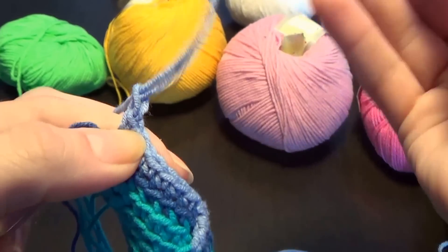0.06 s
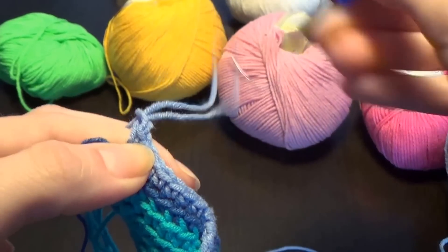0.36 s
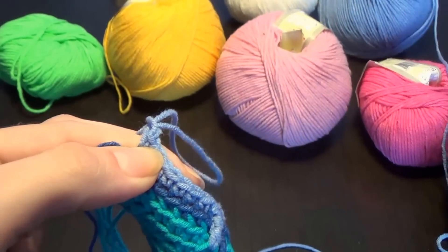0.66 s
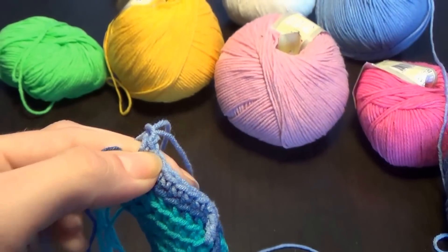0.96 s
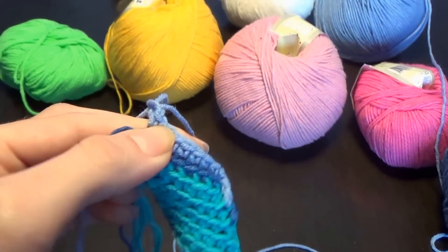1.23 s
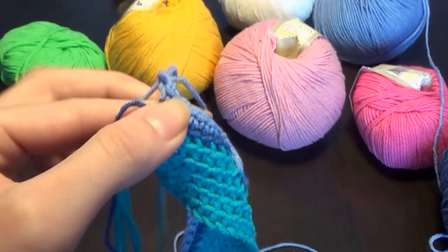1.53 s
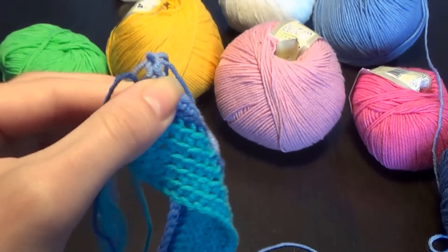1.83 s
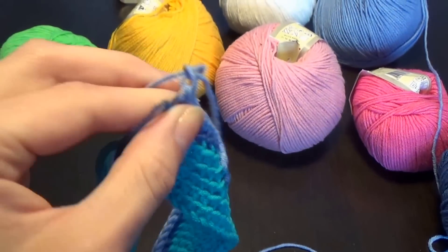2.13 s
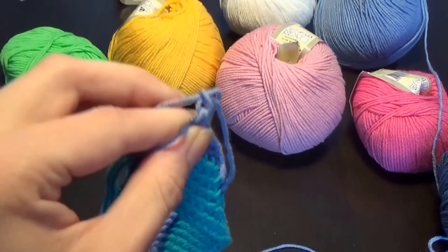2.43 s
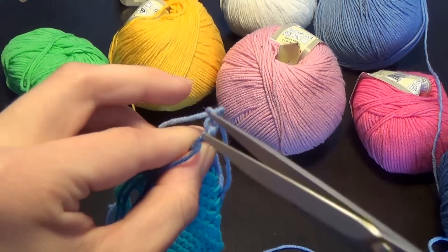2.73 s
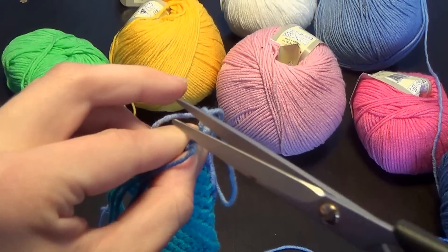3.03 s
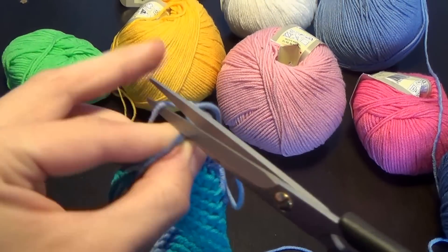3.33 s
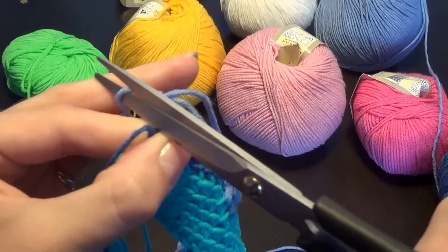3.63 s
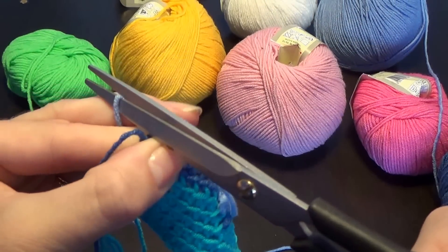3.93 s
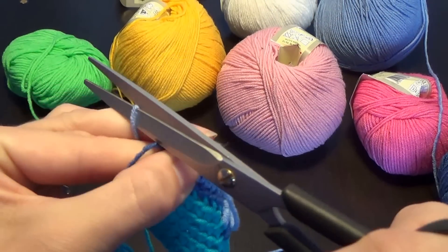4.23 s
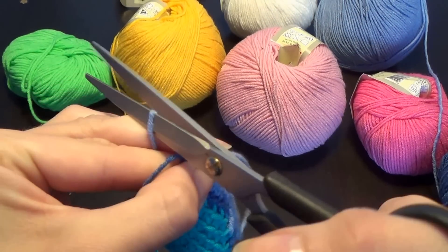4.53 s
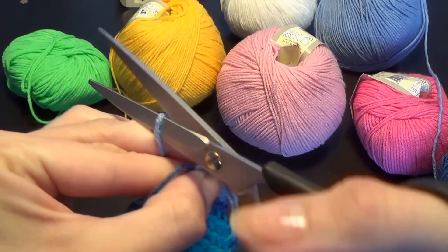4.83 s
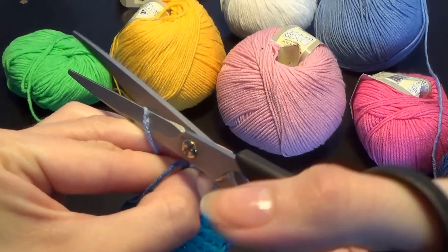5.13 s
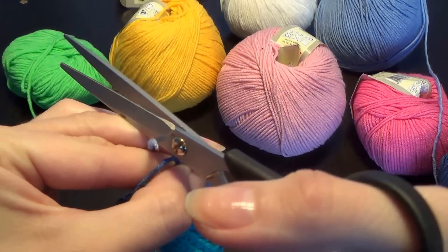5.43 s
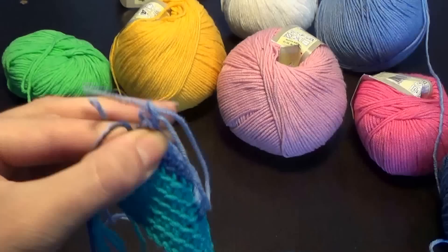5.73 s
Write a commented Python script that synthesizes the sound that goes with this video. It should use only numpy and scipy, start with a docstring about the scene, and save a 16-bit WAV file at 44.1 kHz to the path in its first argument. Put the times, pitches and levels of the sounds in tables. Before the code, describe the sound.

Small, close handling sounds are spaced out over soft indoor hum. First a hook taps and rings briefly on a tabletop, followed by a muffled low thump from a hand. Steel scissors give a short, sharp rattle when lifted. Yarn hisses very faintly over fingers and blades, until a single dry snip cuts it and the scissors touch the table.

```python
"""Cutting yarn at a table

In a quiet room, a crochet hook is laid on a table and rings, and a hand bumps the table softly.
Scissors clack as they are picked up, rub along the yarn, bite into it, snip shut
and are laid down again. Knocks are fading tones plus a crack of noise; rubbing is grainy noise.
A fan and mains hum murmur behind; the right microphone takes in more bass than the left."""
import sys
import numpy as np
from scipy import signal
from scipy.fft import rfft, irfft, next_fast_len
from scipy.io import wavfile
from scipy.ndimage import map_coordinates

SR = 44100
rng = np.random.default_rng(int(sys.argv[2]) if len(sys.argv) > 2 else 0)


def inscribe(sig):
    """Save sig as 16-bit PCM at rate SR to the path in sys.argv[1].

    A 1-D sig is mono; a 2-D sig holds one channel per row.
    Samples are clipped to [-1, 1] before scaling.
    """
    pcm = np.round(np.clip(np.atleast_2d(sig).T, -1, 1) * 32767)
    wavfile.write(sys.argv[1], SR, pcm.astype(np.int16))


N = 264099
RING_T = np.arange(SR // 3) / SR  # seconds since a blow


def amp(db):
    """Turn decibels into a gain."""
    return 10 ** (np.asarray(db) / 20)

def unit(x):
    """Scale a sound to an average (rms) size of 1."""
    return x / np.sqrt(np.mean(x ** 2) + 1e-20)

def along(points, hz):
    """Read a curve of (frequency, value) points on a log frequency axis."""
    f, v = np.transpose(points)
    return np.interp(np.log(hz + 1), np.log(f + 1), v)

def filtered(x, response):
    """Turn each frequency up or down by the gain response(hz)."""
    size = x.shape[-1]
    padded = next_fast_len(size + 8192)
    return irfft(rfft(x, padded) * response(np.fft.rfftfreq(padded, 1 / SR)), padded)[..., :size]

def noise(spectrum, size):
    """Noise with the given tone colour, at rms 1."""
    return unit(filtered(rng.standard_normal(size), lambda hz: amp(along(spectrum, hz))))

def wobble(rate):
    """A smooth curve through `rate` random values a second."""
    return map_coordinates(rng.standard_normal(N // 8), [np.arange(N) * rate / SR], mode="wrap")

def add(track, s, sound):
    """Mix a sound into a track at second s."""
    part = track[round(s * SR):][:len(sound)]
    part += sound[:len(part)]

def stroke(s, length):
    """A swell that starts at s and is over after `length` seconds."""
    progress = np.clip((np.arange(N) / SR - s) / length, 0, 1)
    return np.sqrt(np.abs(np.sin(np.pi * progress)))

def ring(tones):
    """A struck thing's tones, a bit different each blow; each fades 60 dB in its fade time, t60."""
    hz, db, t60 = np.transpose(tones)[:, :, None]
    strength = db + rng.standard_normal(hz.shape)
    waves = np.sin(2 * np.pi * (hz * RING_T + rng.random(hz.shape)))
    return np.sum(amp(strength - 60 * RING_T / t60) * waves, 0)

def crack(spectrum, t60):
    """The brief noise of two things touching."""
    return noise(spectrum, len(RING_T)) * amp(-60 * RING_T / t60)

def blows(rows, body, attack_s):
    """Play body() once a row, with that row's brightness and its level over the first 5 ms."""
    track = np.zeros(N)
    for s, db, bright in rows:
        hit = body() * (1 - np.exp(-(RING_T / attack_s) ** 2))
        hit = filtered(hit, lambda hz: amp(bright * np.log2(np.clip(hz, 700, 9000) / 700)))
        add(track, s, amp(db) * hit / hit[RING_T < .005].std())
    return track

def friction(rows, spectrum):
    """Strokes of rubbing; tiny slips make the noise grainy."""
    pressure = sum(amp(db) * stroke(s, length) for s, length, db in rows)
    slips = amp(2 * wobble(300))
    return pressure * unit(noise(spectrum, N) * slips)


# tone colour of the air: f/Hz, level/dB
AIR_COLOUR = [(15, -46), (25, -23), (59, -11.5), (91, -14), (108, -7), (208, -5), (242, -4.5), (268, -8.5),
              (363, -8), (571, -12), (699, -8.5), (1220, -14.5), (1610, -17), (2070, -20.5), (10400, -28.5),
              (13500, -100), (22000, -120)]
# how alike the air sounds left and right: f/Hz, likeness (0-1)
AIR_LIKENESS = [(30, 0.36), (80, 0.82), (300, 0.91), (1500, 0.94), (4000, 0.89), (10000, 0.73)]
# tones of the fan and mains: f/Hz, level/dB, unsteadiness (0-1)
HUM_TONES = [(121.7, -63.5, 0.13), (146.7, -67, 0.23), (240.1, -62.5, 0.52), (374.6, -72.5, 1),
             (483.5, -70.5, 0.7), (1558, -78.5, .3), (5670, -91, 0.4)]

def room_tone():
    """Steady air noise with the wavering hum of a fan and the mains."""
    def shares(hz):
        angle = np.arccos(np.clip(along(AIR_LIKENESS, hz), -1, 1)) / 2
        return np.array([np.cos(angle), np.sin(angle)])
    air = np.array([noise(AIR_COLOUR, N), noise(AIR_COLOUR, N)])
    middle, side = amp(-53.8) * filtered(air, shares)
    for hz, db, unsteady in HUM_TONES:
        phase = 2 * np.pi * hz * np.arange(N) / SR
        tone = (1 + unsteady * wobble(7)) * np.sin(phase)
        drift = unsteady * wobble(7) * np.cos(phase)
        middle = middle + amp(db) * unit(tone + drift)
    return np.array([middle + side, middle - side])


# how long the room echoes: f/Hz, fade time/s
ECHO_FADE = [(200, 0.35), (2000, 0.25), (10000, 0.18)]

def wall_echo(x):
    """The walls answer with a short tail, different at each microphone."""
    hz, t, spectra = signal.stft(rng.standard_normal((2, SR // 2)), SR, nperseg=256)
    fade = amp(-60 * t / along(ECHO_FADE, hz)[:, None])
    tail = signal.istft(spectra * fade, SR, nperseg=256)[1]
    tail = tail + .5 * tail[::-1]  # the microphones sit close together
    return signal.fftconvolve(x[None], tail / np.linalg.norm(tail[0]), axes=1)[:, :N]

def scattered(x):
    """Hands and camera scatter short waves, so the treble differs between the microphones."""
    paths = crack([(500, -1), (2500, -12), (5000, -3), (10000, -9.5)], t60=0.028)
    side = amp(-14) * signal.fftconvolve(x, paths / np.linalg.norm(paths))[:N]
    return np.array([side, -side])

def placed(x, left_db):
    """A near source, louder on the left by left_db (on the right if negative)."""
    return x * amp([[left_db / 2], [-left_db / 2]])


# strokes along the yarn: t/s, length/s, level/dB
YARN_STROKES = [(1.86, 0.12, -60), (4.08, 0.26, -57), (4.39, 0.28, -59), (4.87, 0.2, -57)]
# tone colour of sliding yarn: f/Hz, level/dB
YARN_COLOUR = [(1200, -28), (3000, 2), (4500, 7.5), (6500, -10), (8500, 6.5), (10300, 7.5)]

def yarn_rubs():
    """Yarn hisses as it slides over fingers and steel."""
    return friction(YARN_STROKES, YARN_COLOUR)


# strokes over the table: t/s, length/s, level/dB
DRAG_STROKES = [(0.818, 0.025, -45.5), (5.865, 0.062, -53), (5.915, 0.065, -50)]
# tone colour of the scraped table top: f/Hz, level/dB
SCRAPE_COLOUR = [(400, -32), (900, 9), (1400, -1), (2600, 4.5), (3600, -14), (5200, -10), (7000, -15),
                 (10000, -16.5)]

def tool_drags():
    """A tool scrapes briefly over the table."""
    return friction(DRAG_STROKES, SCRAPE_COLOUR)


# the hand lands: t/s, level/dB
HAND_BUMPS = [(1.2237, -31), (1.274, -38.5), (1.361, -40), (1.451, -40)]
# low tones of the table: f/Hz, level/dB, fade time/s
TABLE_TONES = [(77.4, -12, 0.048), (118, 5.5, 0.027), (169, 3, 0.027), (256, -6, 0.034), (496, -6.5, 0.021)]
# a fingernail touches too: t/s, level/dB, brightness/(dB per octave)
NAIL_TAP = [(1.2395, -48, 1)]

def hand_bumps():
    """A soft hand pushes all the table's low tones the same way, as it lands and as it settles."""
    thud = sum(amp(db - 60 * RING_T / t60) * np.sin(2 * np.pi * hz * RING_T)
               for hz, db, t60 in TABLE_TONES)
    thud *= 1 - np.exp(-RING_T / 0.018)  # soft start
    thud /= np.abs(thud).max()
    track = np.zeros(N)
    for s, db in HAND_BUMPS:
        add(track, s, amp(db) * thud)
        add(track, s + .019, amp(db + 2.2) * thud)  # the settling push is a little stronger
    # the board moves little air in the deep bass
    thuds = filtered(track, lambda hz: 1 - 1 / (1 + (hz / 58) ** 4))
    return thuds + blows(NAIL_TAP, lambda: crack(SCRAPE_COLOUR, t60=0.01), attack_s=0.00019)


# the hook meets the table: t/s, level/dB, brightness/(dB per octave)
HOOK_HITS = [(0.7475, -40, -5), (0.771, -46, -4.5), (0.8385, -44, 3), (0.8482, -26, 1)]
# short tones of the hook on the table: f/Hz, level/dB, fade time/s
HOOK_TONES = [(903, 2.5, 0.08), (1156, -7, 0.038), (1810, -3, 0.029), (2130, 3, 0.033), (2620, 4, 0.032),
              (2920, -0.5, 0.026), (3155, -6.5, 0.032), (4270, -4, 0.013), (4820, 8, 0.013),
              (5030, -1, 0.012), (5850, -1, 0.011), (8170, -18, 0.026)]
# its free shaft rings on: f/Hz, level/dB, fade time/s
SHAFT_TONES = [(900, -16, .13), (1710, -30, .35), (2585, -32, .08), (4790, -25, .29)]
# tone colour of each tap's noise: f/Hz, level/dB
TAP_COLOUR = [(180, -51), (300, -5), (528, -44), (889, -2), (1500, -8), (2670, -10), (3710, -19),
              (4920, -21), (5460, -17), (8400, -34), (10500, -40), (13600, -75), (22000, -120)]

def hook_taps():
    """The hook touches down lightly, then drops flat and rings."""
    body = lambda: ring(HOOK_TONES + SHAFT_TONES) + amp(5.5) * crack(TAP_COLOUR, t60=0.021)
    return blows(HOOK_HITS, body, attack_s=0.00095)


# the scissors knock: t/s, level/dB, brightness/(dB per octave), number of contacts,
# gap between them/s, brightness change per contact/(dB per octave)
SCISSOR_KNOCKS = [(2.6745, -23.5, -1, 2, .0112, 4), (2.7522, -30, 0, 1, 0, 0),
                  (2.7848, -35.5, -1.5, 3, .0043, -2), (5.9330, -41.5, 0, 2, .0068, -1.5)]
# steel blades damped by plastic handles: f/Hz, level/dB, fade time/s
SCISSOR_TONES = [(974, -13.5, 0.065), (1400, -15, 0.028), (1700, -1, 0.022), (1890, -7, 0.046),
                 (2123, -1.5, 0.038), (2624, -8.5, 0.025), (3300, -7, 0.012), (3570, -16, 0.0088),
                 (4240, -0.5, 0.013), (4990, 10.5, 0.01), (5600, 5, 0.014), (5900, 7, 0.013),
                 (6700, -6, 0.018), (9930, -13, 0.0079)]
# the free blades ring on: f/Hz, level/dB, fade time/s
FREE_BLADE_TONES = [(942, -26, .17), (2003, -30, .13), (4807, -26, .18)]
# tone colour of each clack's noise: f/Hz, level/dB
CLACK_COLOUR = [(250, -13), (600, -20), (950, -1.5), (1800, -4), (2400, -5.5), (4000, -4), (5800, -7),
                (7000, -14), (8200, -28), (9200, -37), (10300, -17.5)]

def scissor_clacks(loss_db=2.5):
    """Loose blades and handles rattle on the table in evenly spaced, ever weaker contacts."""
    contacts = [(s + k * gap, db - k * loss_db, bright + k * change)
                for s, db, bright, count, gap, change in SCISSOR_KNOCKS for k in range(round(count))]
    body = lambda: ring(SCISSOR_TONES + FREE_BLADE_TONES) + amp(-0.5) * crack(CLACK_COLOUR, t60=0.036)
    return blows(contacts, body, attack_s=0.00072)


CUT_S = 5.815  # when the blades meet
# fibres catch and shear between the blades: t/s, length/s, level/dB, centre f/Hz
FIBRE_BITES = [(4.658, 0.013, -50.5, 8100), (4.67, 0.021, -54.5, 7800), (5.114, 0.037, -54.5, 6800),
               (5.147, 0.022, -52.5, 7400)]

def yarn_bites(grains_per_s=900):
    """Grainy bursts: the blades bite the yarn; later a faint hiss is heard, then the strand tears."""
    hiss = (CUT_S - .024, .024, -50, 8300)  # faint bright hiss just before the snip
    tear = (CUT_S - .0052, .003, -30.5, 10200)  # both have the columns of FIBRE_BITES
    track = np.zeros(N)
    for s, length, db, centre_hz in FIBRE_BITES + [hiss, tear]:
        grains = rng.standard_normal(N) * (0.17 + (rng.random(N) < grains_per_s / SR))
        band = filtered(grains, lambda hz: 1 / (1 + (np.log2((hz + 1) / centre_hz) / .45) ** 2))
        burst = stroke(s, length) * band
        track += amp(db) * burst * np.sqrt(length * SR / np.sum(burst ** 2))
    return track


# edge grazes edge as the blades are set on the yarn: t/s, level/dB
EDGE_GRAZES = [(3.796, -58), (3.813, -53.5), (3.826, -55.5)]
# tones of the closing blades: f/Hz, level/dB, fade time/s
SNIP_TONES = [(990, -3.5, 0.0049), (1740, -6, 0.0059), (2720, -7, 0.006), (3920, 3, 0.0065),
              (5200, -5, 0.0045), (6850, 6.5, 0.0055), (9950, 12.5, 0.0043)]
# tone colour of the edges' tick: f/Hz, level/dB
EDGE_COLOUR = [(180, -49), (300, -14), (929, -18), (2670, -1), (3150, -8), (3710, 0), (4430, -2),
               (5070, -2), (6820, -15), (10500, 2.5), (13600, -32), (22000, -120)]

def blade_snips():
    """The edges tick drily; at the cut they snap shut and bounce once, weaker and duller."""
    grazes = [(s, db, -1) for s, db in EDGE_GRAZES]  # t/s, level/dB, brightness/(dB per octave)
    shut = (CUT_S, -27.5, .5)
    bounce = (CUT_S + .0082, -48.5, -6)
    body = lambda: ring(SNIP_TONES) + amp(10) * crack(EDGE_COLOUR, t60=0.0065)
    return blows(grazes + [shut, bounce], body, attack_s=0.00044)


def scene():
    """Tools on the table, blades and yarn in the hands, and the room around them."""
    on_table = hook_taps() + scissor_clacks() + tool_drags()
    in_hands = blade_snips() + yarn_bites() + yarn_rubs() + hand_bumps()
    near = placed(on_table, left_db=0.3) + placed(in_hands, left_db=-2) + scattered(on_table + in_hands)
    # balls of wool soak up treble on its way to the walls
    muffled = filtered(on_table, lambda hz: 1 / np.sqrt(1 + (hz / 5000) ** 4))
    return near + wall_echo(amp(-14) * muffled + amp(-10.5) * in_hands) + room_tone()


TOP_HZ = 10550
# balance of the microphones: f/Hz, left minus right level/dB
MIC_BALANCE = [(25, -6), (65, -14), (125, -10), (180, -8), (250, -4), (400, -1), (1000, -0.2), (5000, 0.1),
               (10000, 0.5)]

def record(dry):
    """The right microphone takes in more bass; treble above TOP_HZ is cut off."""
    def microphones(hz):
        left_db = along(MIC_BALANCE, hz)
        gains = amp([left_db / 2, -left_db / 2])
        return gains / gains.mean(0) / np.sqrt(1 + (hz / TOP_HZ) ** 200)
    return filtered(dry, microphones)


dry = scene()
out = record(dry)
inscribe(out)
```